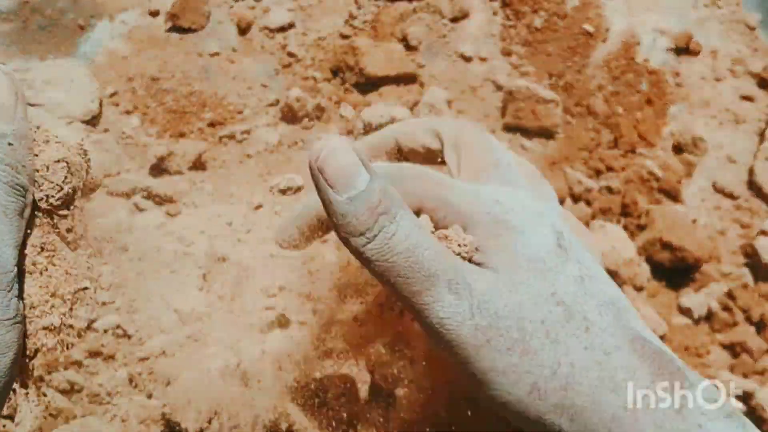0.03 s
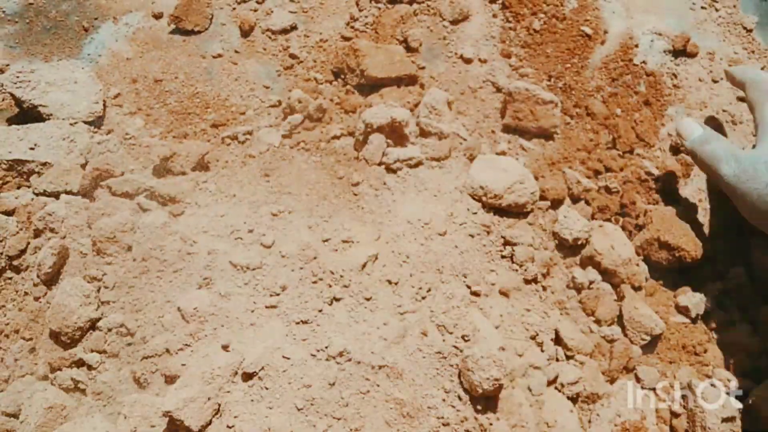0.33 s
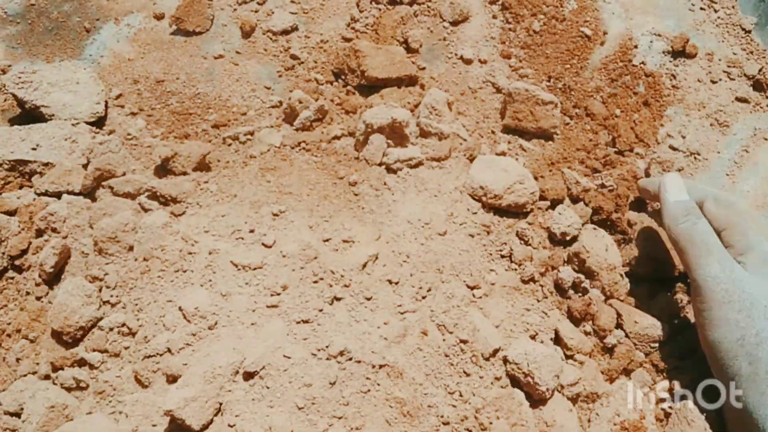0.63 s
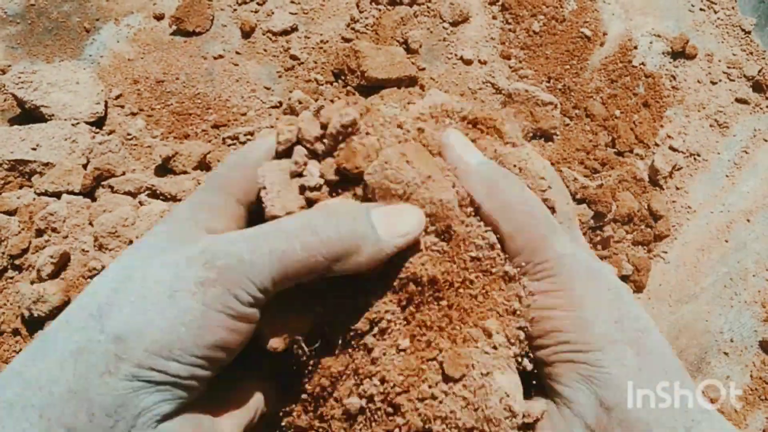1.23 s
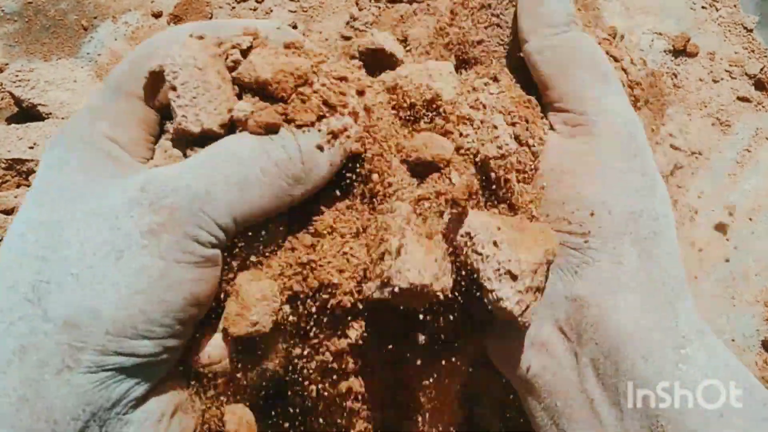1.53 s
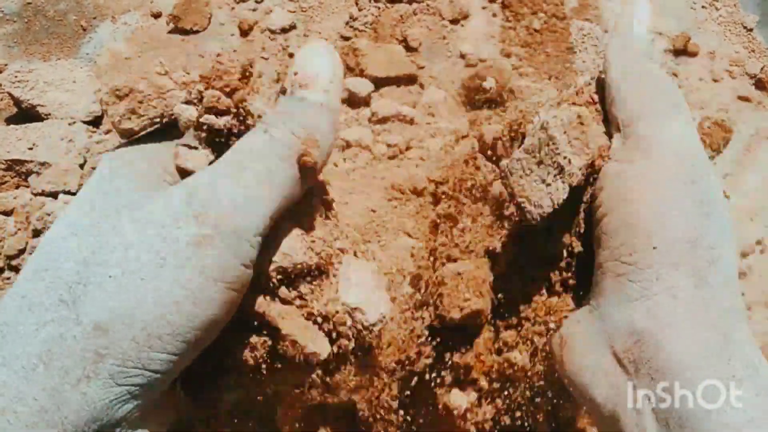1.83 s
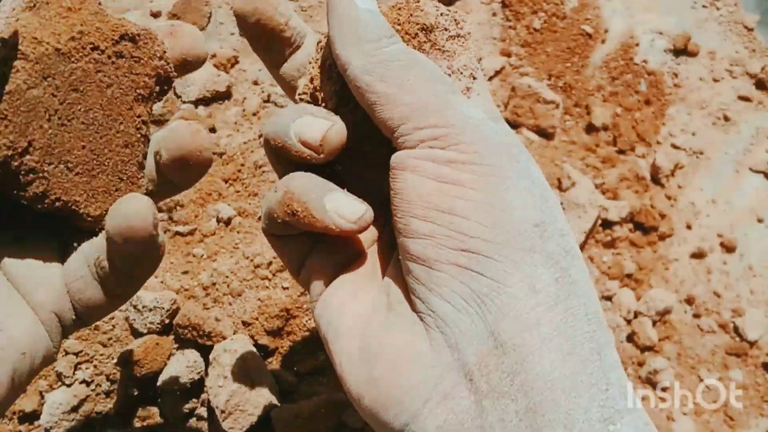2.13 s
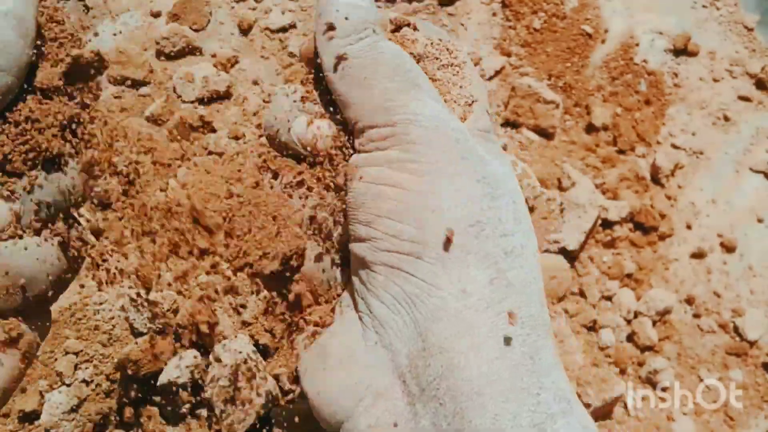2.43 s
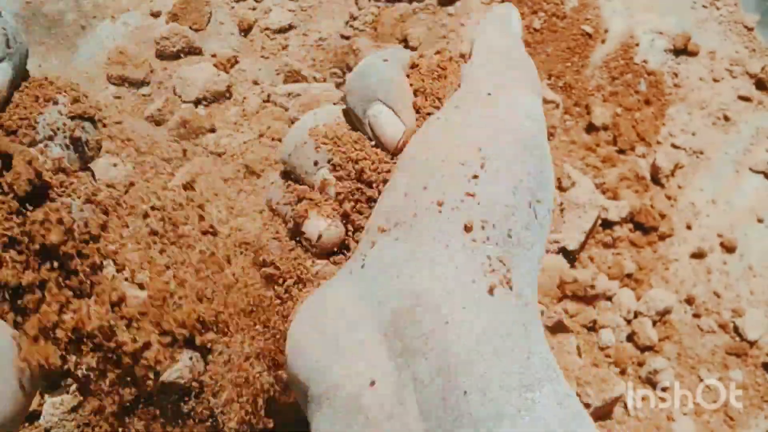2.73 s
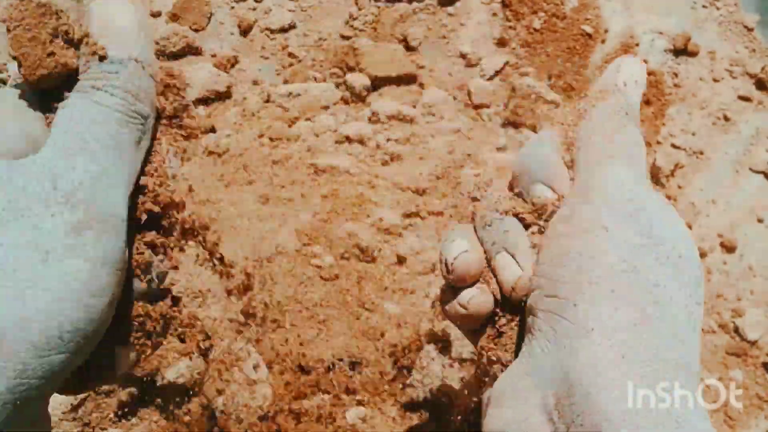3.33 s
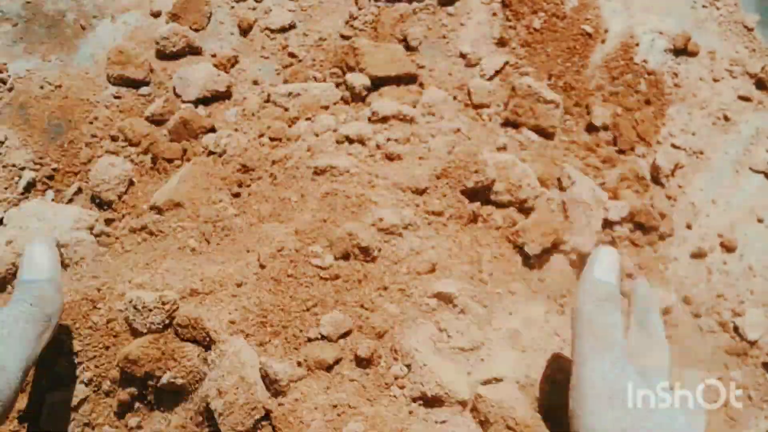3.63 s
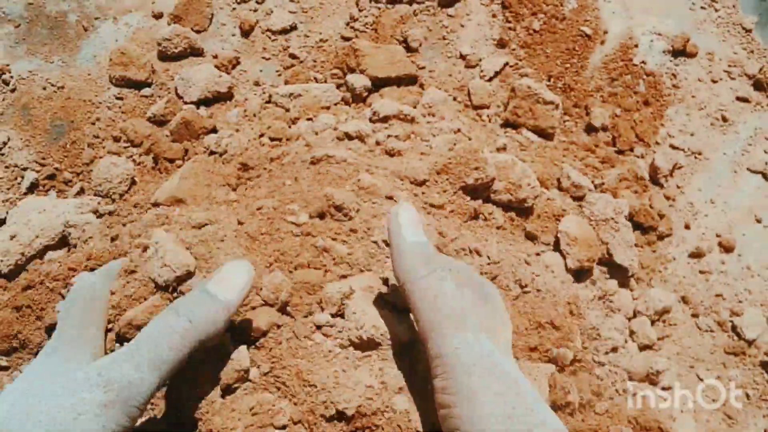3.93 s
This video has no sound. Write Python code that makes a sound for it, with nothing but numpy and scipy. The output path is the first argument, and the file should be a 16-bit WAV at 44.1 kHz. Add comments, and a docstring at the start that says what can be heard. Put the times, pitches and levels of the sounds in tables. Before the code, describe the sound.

Hands crumble dry sand lumps with a gritty hiss as birds call and wind puffs.

```python
"""Crushing dry sand by hand

Close up, hands crush lumps of dry sand: countless ticking grains merge into a hiss while crumbs snap
and rain onto rubble. A first handful is scooped and poured in still air. After a brief gap a second
is crumbled while wind puffs on the microphone. Birds call in the distance."""
import sys
import numpy as np
from scipy import signal
from scipy.fft import rfft, irfft, next_fast_len
from scipy.io import wavfile
from scipy.ndimage import uniform_filter1d, map_coordinates

SR = 44100
rng = np.random.default_rng(int(sys.argv[2]) if len(sys.argv) > 2 else 0)


def unload_audio(sound):
    """Save the sound as a 16-bit wav file, at the path given as the first command line argument."""
    columns = np.transpose(np.atleast_2d(sound))
    # keep every value between -1 and 1, then stretch to whole-number steps
    steps = np.round(np.clip(columns, -1, 1) * 32767)
    wavfile.write(sys.argv[1], SR, steps.astype(np.int16))


N = 176400
GAP_START_S, GAP_END_S = 1.918, 1.958  # between the two handfuls


def amp(db):
    """Decibels to gain."""
    return 10 ** (np.asarray(db) / 20)


def unit(x):
    """Scale to rms 1."""
    return x / np.sqrt(np.mean(x ** 2) + 1e-20)


def curves(rows):
    """Breakpoints to envelopes, one for each column after the time."""
    times, *columns = np.transpose(rows)
    return [np.interp(np.arange(N) / SR, times, column) for column in columns]


def wobble(rate):
    """A smooth random curve, rate knots a second."""
    return map_coordinates(rng.standard_normal(int(N * rate / SR) + 4), [np.arange(N) * rate / SR])


def filtered(x, response):
    """EQ x with a gain given as a function of frequency."""
    size = next_fast_len(N + SR // 2)
    return irfft(rfft(x, size) * response(np.fft.rfftfreq(size, 1 / SR)), size)[:N]


def coloured(x, eq):
    """x through a breakpoint EQ, at rms 1."""
    freqs, db = np.transpose(eq)
    return unit(filtered(x, lambda hz: amp(np.interp(np.log(hz + 1), np.log(freqs), db))))


def bell_band(hz, centre_hz, octaves):
    """Gain of a bell-shaped band on a log-frequency axis."""
    return np.exp(-.5 * (np.log2((hz + 1) / centre_hz) / octaves) ** 2)


def band_noise(hz, width_hz):
    """Noise of rms about 1 in a narrow band around a pitch given per sample."""
    phase = 2 * np.pi * np.cumsum(hz) / SR
    position = np.arange(len(hz)) * width_hz / SR
    a, b = (map_coordinates(knots, [position]) for knots in rng.standard_normal((2, 4096)))
    return a * np.sin(phase) + b * np.cos(phase)


def add(track, start_s, sound):
    """Mix a sound into the track."""
    i = max(0, round(start_s * SR))
    part = sound[:max(0, N - i)]
    track[i:i + len(part)] += part


# Tone of the outdoor bed (frequency [Hz], gain [dB])
AIR_EQ = [(20, -20), (50, 14), (250, 7.5), (600, -4), (1500, -5), (4000, -43.5), (15000, -39)]
def air():
    """Quiet outdoor air: a steady, dark bed of noise."""
    return amp(-65) * coloured(rng.standard_normal(N), AIR_EQ)


def whistle(hz, gain, blur, width_hz, roughness=.006):
    """A slightly rough note with soft ends; blur is the share smeared into a band of noise."""
    hz = hz * (1 + roughness * wobble(250)[:len(hz)])
    pure = np.sqrt(2 * (1 - blur)) * np.sin(2 * np.pi * np.cumsum(hz) / SR)
    breathy = np.sqrt(blur) * band_noise(hz, width_hz)
    return gain * signal.windows.tukey(len(hz), .3) * (pure + breathy)


# Distant whistles (time [s], length [s], start pitch [Hz], end pitch [Hz], level [dB])
FAR_NOTES = [(0.235, .14, 1442, 1425, -46), (.27, 0.056, 3440, 3510, -50), (0.293, .18, 2082, 1992, -50.5),
             (0.369, 0.075, 1400, 1300, -53), (1.049, 0.16, 639, 644, -55.5),
             (1.333, 0.085, 1247, 1380, -54.5), (1.375, 0.15, 1387, 1457, -49),
             (2.101, 0.12, 1500, 1535, -59.5), (2.265, 0.05, 1270, 1235, -66.5),
             (2.425, 0.06, 1280, 1350, -57), (3.231, 0.13, 1236, 1273, -55),
             (3.748, 0.057, 1487, 1596, -54)]
def far_birds():
    """Far birds whistle short, blurred glides."""
    out = np.zeros(N)
    for start, length, first_hz, last_hz, db in FAR_NOTES:
        glide = np.linspace(first_hz, last_hz, int(length * SR))
        add(out, start, whistle(glide, amp(db), blur=.55, width_hz=150))
    return out


# One repeated call (time [s], pitch midway through the held note [Hz], level [dB])
NEAR_CALLS = [(3.0, 2770, -42.5), (3.228, 2666, -39), (3.469, 2694, -45), (3.703, 2730, -38.5),
              (3.93, 2710, -41.5)]
def near_bird(call_s=.125, swoop_s=.06, swoop_hz=1400, rise_hz_per_s=2600):
    """A nearer bird swoops down onto a held, gently rising note."""
    out, t = np.zeros(N), np.arange(int(call_s * SR)) / SR
    swoop = np.clip(1 - t / swoop_s, 0, 1)
    fall = swoop_hz * np.sin(np.pi / 2 * swoop)
    rise = rise_hz_per_s * (t - (swoop_s + call_s) / 2)
    rasp = np.tanh(6 * swoop)  # the swoop is softer and raspier than the held note
    for start, hz, db in NEAR_CALLS:
        call = whistle(hz + fall + rise, amp(db - 10 * rasp), blur=.08 + .5 * rasp, width_hz=400)
        add(out, start, call)
    return out


def outdoor_echo(x, t60_s=.41, wet_db=-2.5):
    """Outdoor reflections add a short, diffuse tail."""
    t = np.arange(SR // 2) / SR
    tail = rng.standard_normal(len(t)) * amp(-60 * t / t60_s)
    return x + amp(wet_db) * signal.fftconvolve(x, tail / np.linalg.norm(tail))[:N]


# Gust envelope (time [s], level [dB])
GUSTS = [(1.96, -45.5), (2.02, -30.5), (2.1, -23.5), (2.16, -36.5), (2.3, -28.5), (2.45, -36),
         (2.53, -14.5), (2.56, -30), (2.6, -22), (2.74, -22), (2.8, -30), (2.91, -34.5), (2.99, -31),
         (3.05, -35), (3.15, -34.5), (3.2, -17), (3.27, -30), (3.47, -34), (3.56, -38.5), (3.65, -27),
         (3.72, -19), (3.79, -35.5), (3.84, -23), (3.88, -30.5), (3.94, -23), (4, -31.5)]
# Tone of the rumble (frequency [Hz], gain [dB])
RUMBLE_EQ = [(20, -35), (35, -15), (55, 1), (80, 7.5), (120, 2.5), (170, -6), (250, -16), (350, -31.5),
             (500, -49), (2000, -75)]
def wind_rumble():
    """Wind on the microphone: a low flutter, levelled so that the gusts shape its swells."""
    level_db, = curves(GUSTS)
    rumble = coloured(rng.standard_normal(N), RUMBLE_EQ)
    running_rms = np.sqrt(np.abs(uniform_filter1d(rumble ** 2, size=1500)) + 1e-6)
    return amp(level_db) * rumble / uniform_filter1d(running_rms, size=700)


# Thumps of single eddies (time [s], level [dB], pitch [Hz])
EDDIES = [(2.049, -16, 109), (2.298, -15.5, 90), (2.078, -4.5, 112), (2.504, 0.5, 122), (2.52, -7, 213),
          (2.579, -6.5, 174), (2.661, -14.5, 132), (2.681, -15.5, 280), (2.696, -7.5, 276),
          (2.699, -11, 147), (2.733, -12.5, 251), (2.748, -9, 151), (2.941, -18.5, 85), (3.178, -17, 124),
          (3.216, -17, 96), (3.313, -20, 98), (3.666, -22, 185), (3.692, -10.5, 158), (3.738, -10.5, 84.6),
          (3.847, -16, 120), (3.957, -16.5, 115)]
# Tone of their turbulence (frequency [Hz], gain [dB])
TURBULENCE_EQ = [(80, -14), (200, 2), (350, -1), (550, -17), (900, -29), (2000, -51)]
def wind_puffs(decay_cycles=.64, tip_cycles=.21, turbulence_s=.01):
    """Eddies push and pull the diaphragm; small, quick ones break up into more turbulence."""
    thumps, stir = np.zeros((2, N))
    t = np.arange(-SR // 20, SR // 20) / SR
    window = np.hanning(len(t))
    burst = np.exp(-np.abs(t) / turbulence_s) * window
    for centre, db, hz in EDDIES:
        envelope = np.exp(-(np.hypot(t * hz, tip_cycles) - tip_cycles) / decay_cycles) * window
        add(thumps, centre + t[0], -amp(db) * envelope * np.sin(2 * np.pi * hz * t))
        stir_db = db - 20 + 8 * np.log2(hz / 200)  # 8 dB more for each octave up
        add(stir, centre + t[0], amp(stir_db) * burst)
    return thumps + stir * coloured(rng.standard_normal(N), TURBULENCE_EQ)


# Hollow scrape of the dig (time [s], resonance [Hz], level [dB])
SCRAPE_SWEEP = [(.47, 330, -86), (.495, 330, -41.5), (.55, 330, -41), (.59, 340, -33.5), (.64, 400, -49),
                (.73, 760, -37), (.8, 720, -58), (.87, 550, -45), (1, 550, -69.5)]
def scrape():
    """The cupped hands dig in; their hollow rises in pitch as it fills, then sinks a little."""
    hz, level_db = curves(SCRAPE_SWEEP)
    return amp(level_db) * band_noise(hz, width_hz=210)


# Clod landings (time [s], peak [dB], pitch [Hz])
CLOD_HITS = [(2.709, -31, 1166), (2.803, -27, 427), (2.839, -34, 1510), (3.634, -40, 1270)]
def clods(attack_s=.00063, decay_s=.011):
    """Soft clods land in the palm with dull, quickly damped knocks."""
    out, t = np.zeros(N), np.arange(SR // 10) / SR
    envelope = np.exp(-t / decay_s) * (1 - np.exp(-t / attack_s))
    for start, db, hz in CLOD_HITS:
        knock = band_noise(np.full(len(t), hz), width_hz=254) * envelope
        add(out, start, amp(db) * knock / np.abs(knock).max())
    return out


# Crumb ticks (time [s], peak [dB], pitch [Hz])
CRUMB_HITS = [(.0095, -22, 4900), (0.184, -25, 6000), (.238, -17, 8250), (.241, -22.5, 5500),
              (0.251, -22, 6060), (0.254, -15.5, 6530), (0.2658, -18.5, 6400), (0.3092, -23, 6800),
              (0.326, -25, 6000), (.356, -13.5, 6100), (0.38, -28, 5100), (0.454, -20, 5460),
              (0.483, -22.5, 5200), (.605, -12, 6900), (.587, -15, 1300), (.694, -13.5, 1950),
              (0.7585, -8, 5750), (1.8408, -15.5, 7400), (1.903, -21, 4500), (1.904, -12.5, 770),
              (2.053, -20.5, 3850), (2.094, -44, 2960), (2.7115, -14, 4100), (2.715, -22.5, 2080),
              (2.77, -20.5, 4020), (2.812, -19.5, 4470), (3.02, -15, 2620), (3.024, -21.5, 3850),
              (3.275, -25, 8000), (3.376, -18.5, 3620), (3.4, -28, 1900), (3.469, -20, 8500),
              (3.493, -22, 4400), (3.552, -22, 8500)]
def crumbs(decay_s=.00092, size=2048):
    """Crumbs snap or hit the rubble, each a dry tick around its own pitch."""
    out, t, hz = np.zeros(N), np.arange(size) / SR, np.fft.rfftfreq(size, 1 / SR)
    lead = size // 64  # room for the filter to ring ahead of the hit
    rolloff = 1 / np.sqrt(1 + (hz / 9000) ** 12)  # soft crumbs carry little top end
    for start, db, pitch in CRUMB_HITS:
        burst = np.roll(rng.standard_normal(size) * np.exp(-t / decay_s), lead)
        tick = irfft(rfft(burst) * bell_band(hz, pitch, octaves=.76) * rolloff)
        add(out, start - lead / SR, amp(db) * tick / np.abs(tick).max())
    return out


def slips(per_s=55, decay_s=.0058, depth=.49):
    """Gain that jumps at each tiny collapse and dies away."""
    when, chance = rng.random((int(per_s * N / SR), 2)).T
    kicks = np.bincount((when * N).astype(int), -np.log(1 - chance), N)
    return 1 + depth * signal.lfilter([1], [1, -np.exp(-1 / (decay_s * SR))], kicks)


def patchy(x, quick_db=1.7, slow_db=2.5):
    """Quick and slow random patches of gain give the hiss a restless, streaky colour."""
    spectrum = signal.stft(x, nperseg=512)[2]

    def patches(bins, frames):
        across_pitch = uniform_filter1d(rng.standard_normal(spectrum.shape), bins, axis=0)
        return unit(uniform_filter1d(across_pitch, frames, axis=1))

    gain_db = quick_db * patches(bins=8, frames=3) + slow_db * patches(bins=3, frames=14)
    return signal.istft(spectrum * amp(gain_db), nperseg=512)[1][:N]


def grains(hiss_share, per_s=2200, spread_db=2.4, decay_s=.00027):
    """Spurts of single ticking grains, over the hiss of countless smaller ones."""
    when, chance = rng.random((int(per_s * N / SR), 2)).T
    strength = amp(spread_db * np.minimum(-np.log(1 - chance), 5))
    age = np.arange(64)  # samples
    ticks = strength[:, None] * rng.standard_normal((len(when), len(age))) * np.exp(-age / SR / decay_s)
    positions = (when[:, None] * N).astype(int) + age
    rain = unit(np.bincount(positions.ravel(), ticks.ravel(), N)[:N])
    stream = np.sqrt(1 - hiss_share) * rain + np.sqrt(hiss_share) * rng.standard_normal(N)
    return patchy(stream * slips())


# Tone of sifting dust (frequency [Hz], gain [dB])
DUST_EQ = [(4000, -35), (7000, -18), (8000, 5), (9000, -5.5), (11000, -8.5), (13000, -18), (15500, -24)]
def sand(flow, fine_eq, coarse_eq, hiss_share, dust_offset_db):
    """A stream of grains: a bright trickle, a duller crunch and a thin sift of dust."""
    fine_db, coarse_db = curves(flow)
    dust_db = dust_offset_db + .7 * fine_db  # dust sifts on, fading more slowly than the main flow
    layers = [(fine_db, fine_eq), (coarse_db, coarse_eq), (dust_db, DUST_EQ)]
    return sum(amp(db) * coloured(grains(hiss_share), eq) for db, eq in layers)


# Sand flow of the first handful (time [s], fine level [dB], coarse level [dB])
SCOOP_FLOW = [(0, -34.5, -40.5), (.09, -40, -58), (.118, -28, -48), (.14, -40, -49.5), (.22, -40.5, -64.5),
              (.29, -52, -80), (.38, -44, -56.5), (.44, -56.5, -58), (.478, -52.5, -52.5),
              (.487, -32.5, -38), (.53, -43, -38), (.568, -31.5, -30), (.583, -18, -24.5),
              (.66, -21, -31.5), (.68, -22, -27.5), (.78, -26.5, -35), (.92, -34, -43.5), (1.0, -39.5, -45),
              (1.08, -42, -51.5), (1.2, -62, -69), (1.23, -51.5, -54), (1.26, -64, -64),
              (1.305, -51, -60.5), (1.345, -66.5, -63), (1.41, -58, -55), (1.43, -37.5, -52.5),
              (1.5, -38.5, -54), (1.53, -36, -37), (1.63, -28, -34), (1.73, -33.5, -37.5),
              (1.82, -39, -40.5), (1.884, -31.5, -41.5), (1.889, -31, -29.5), (1.905, -20.5, -30),
              (1.92, -35.5, -36)]
# Tone of its trickle and of its crunch (frequency [Hz], gain [dB])
SCOOP_FINE_EQ = [(1000, -31.5), (2300, -6), (3300, -2), (4800, 0.5), (6000, -2), (7800, 2.5), (9000, -4.5),
                 (11000, -20), (13000, -27), (15500, -32)]
SCOOP_COARSE_EQ = [(100, -34.5), (420, -14), (660, 1), (1150, -1.5), (1900, 4), (2500, -3.5), (4000, -37.5)]
# Ride on the presence band of the hiss (time [s], gain [dB])
POUR_PRESENCE = [(0, 5), (.17, 0), (.3, -1.5), (.6, -3.5), (.78, 5), (1.0, 4), (1.2, -8), (1.45, -3),
                 (1.6, 2)]
def scooped_handful():
    """Sand is scooped and poured; the middle of the hiss swells as it pours."""
    stream = sand(SCOOP_FLOW, SCOOP_FINE_EQ, SCOOP_COARSE_EQ, hiss_share=.67, dust_offset_db=-20)
    presence_db, = curves(POUR_PRESENCE)
    presence = filtered(stream, lambda hz: bell_band(hz, centre_hz=3540, octaves=.24))
    return stream + (amp(presence_db) - 1) * presence


# Sand flow of the second handful (time [s], fine level [dB], coarse level [dB])
CRUMBLE_FLOW = [(1.96, -75.5, -77), (2.022, -73, -83), (2.034, -48, -47.5), (2.07, -52, -58),
                (2.095, -46.5, -46.5), (2.15, -58.5, -92), (2.25, -73.5, -77.5), (2.41, -71, -79.5),
                (2.435, -62, -70), (2.45, -32.5, -60), (2.5, -50.5, -59.5), (2.52, -30, -45.5),
                (2.56, -38.5, -49.5), (2.7, -38.5, -50.5), (2.8, -35.5, -42), (2.9, -38, -45),
                (3.02, -38, -52.5), (3.09, -48, -58.5), (3.14, -40.5, -71), (3.2, -44, -78),
                (3.29, -38, -52), (3.41, -36, -40.5), (3.49, -36, -43.5), (3.58, -50, -70.5),
                (3.66, -55, -66.5), (3.738, -57, -81), (3.775, -45.5, -69.5), (3.9, -44, -47),
                (4, -47.5, -52.5)]
# Tone of its trickle and of its crunch (frequency [Hz], gain [dB])
CRUMBLE_FINE_EQ = [(1000, -34), (2300, -0.5), (3600, 4.5), (4800, 2), (6000, -1), (7800, 5.5), (9000, -0.5),
                   (11000, -15), (13000, -42), (15500, -39)]
CRUMBLE_COARSE_EQ = [(200, -23), (600, -11), (880, -23), (1080, -3), (1300, 4), (1550, -5.5), (1850, 3.5),
                     (2250, -4), (2600, -2.5), (4000, -25.5)]
def crumbled_handful(comb_delay_s=.00174927, drift=.077, comb_gain=.22):
    """Sand is crumbled; a slowly drifting comb filter makes the hiss slightly hollow."""
    stream = sand(CRUMBLE_FLOW, CRUMBLE_FINE_EQ, CRUMBLE_COARSE_EQ, hiss_share=.46, dust_offset_db=-25.5)
    delay_s = comb_delay_s * (1 + drift * wobble(2))
    delayed = map_coordinates(stream, [np.arange(N) - delay_s * SR])
    return (stream + comb_gain * delayed) / np.hypot(1, comb_gain)


def scene():
    """Two handfuls, one after the other, over birds and quiet outdoor air."""
    first = scooped_handful() + scrape()
    second = crumbled_handful() + wind_rumble() + wind_puffs()
    handfuls = np.where(np.arange(N) / SR > GAP_END_S, second, first)
    return (handfuls + crumbs() + clods() + outdoor_echo(far_birds() + near_bird()) + air())[None]


def record(dry, ceiling=.92, knee=6, gap_db=-35, top_hz=15800):
    """A soft ceiling on the biggest gust, a brief dip between the handfuls, then a high cut."""
    t = np.arange(N) / SR
    limited = dry[0] / (1 + np.abs(dry[0] / ceiling) ** knee) ** (1 / knee)
    gate = uniform_filter1d(1. * ((t < GAP_START_S) | (t > GAP_END_S)), size=40)
    return filtered(limited * np.maximum(gate, amp(gap_db)), lambda hz: hz < top_hz)[None]


dry = scene()
out = record(dry)
unload_audio(out)
```